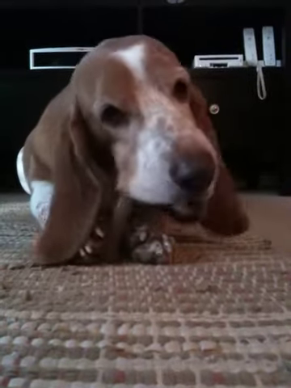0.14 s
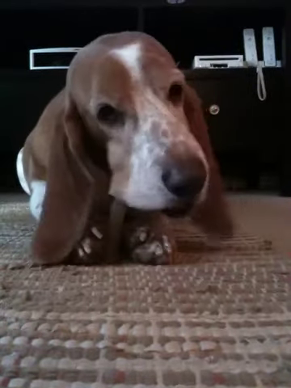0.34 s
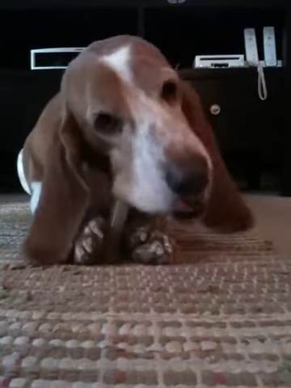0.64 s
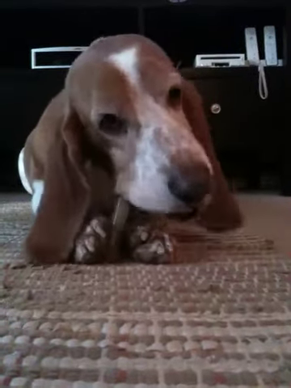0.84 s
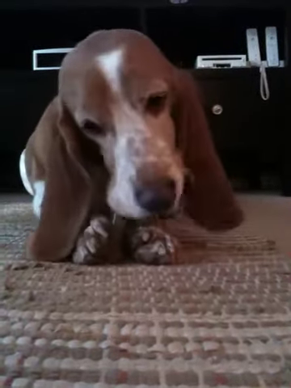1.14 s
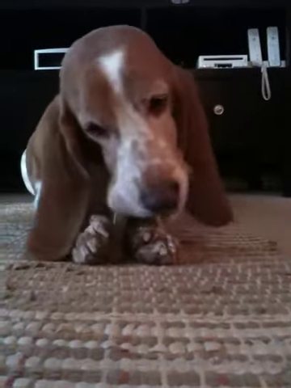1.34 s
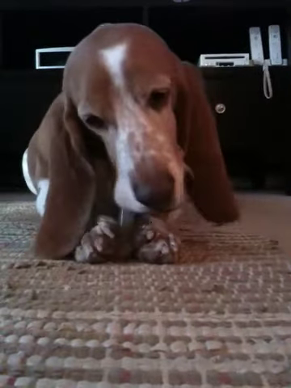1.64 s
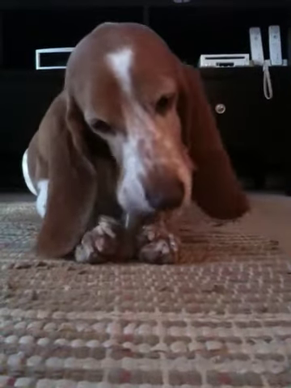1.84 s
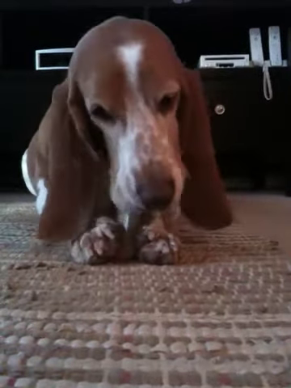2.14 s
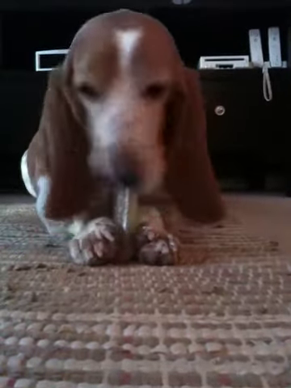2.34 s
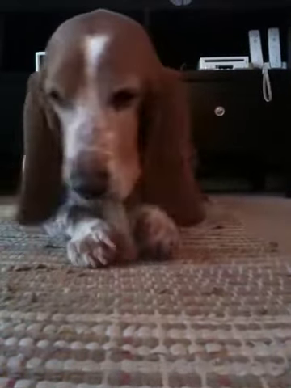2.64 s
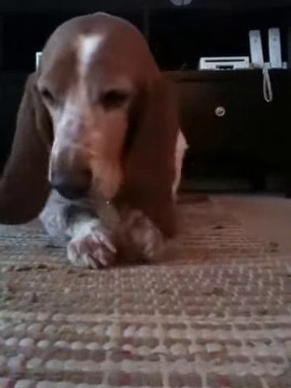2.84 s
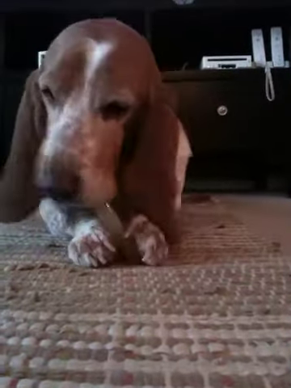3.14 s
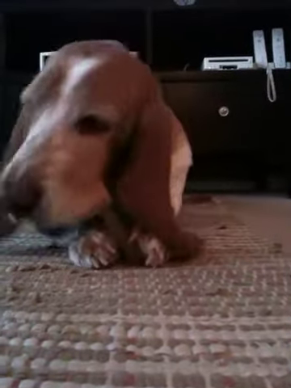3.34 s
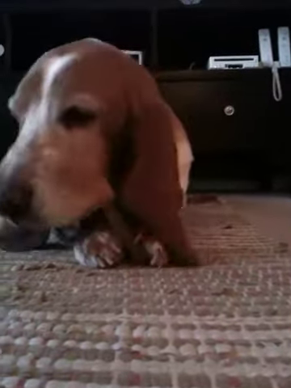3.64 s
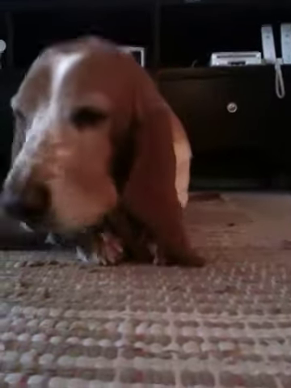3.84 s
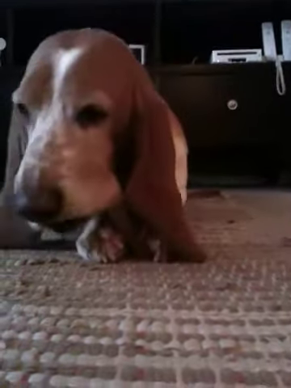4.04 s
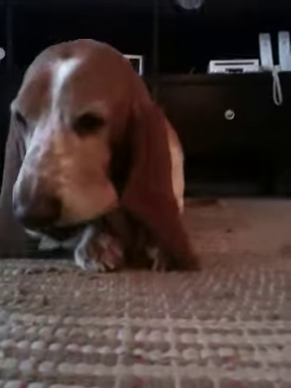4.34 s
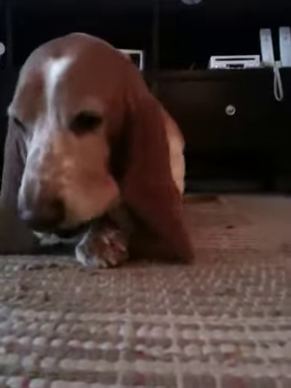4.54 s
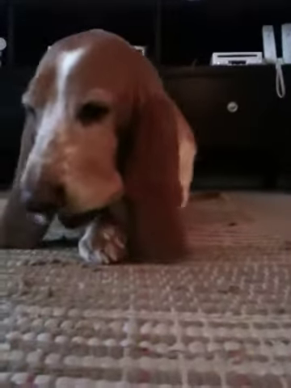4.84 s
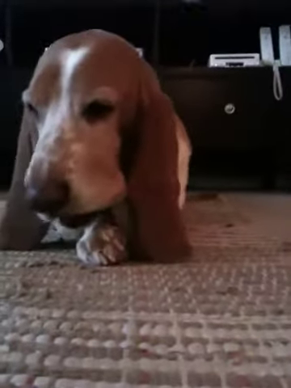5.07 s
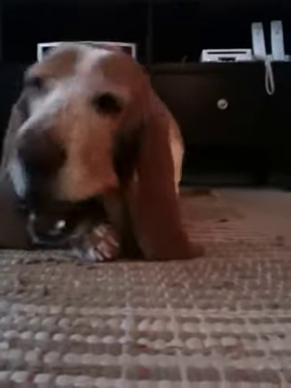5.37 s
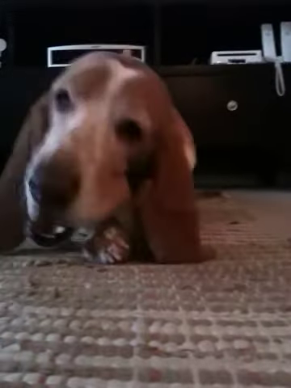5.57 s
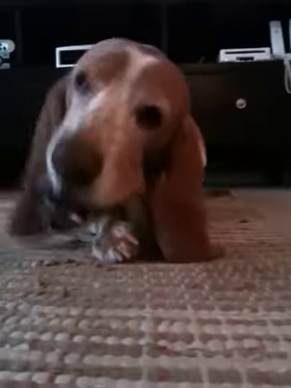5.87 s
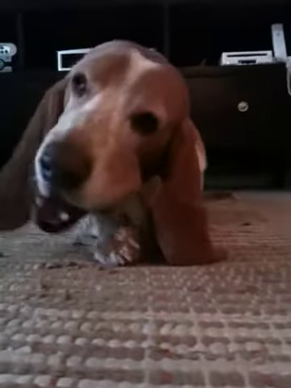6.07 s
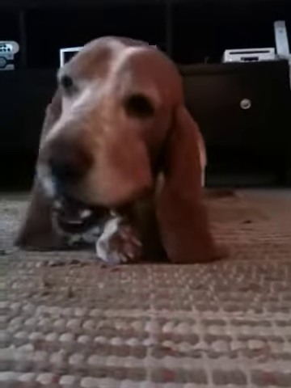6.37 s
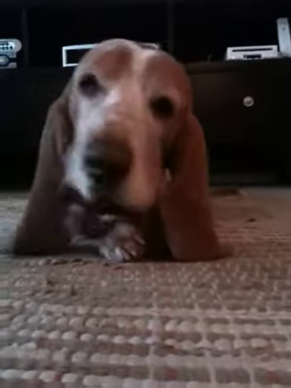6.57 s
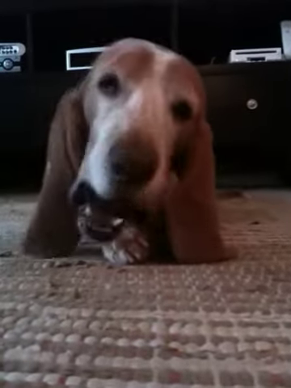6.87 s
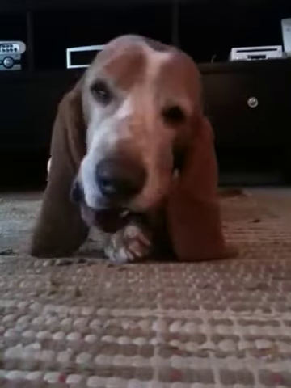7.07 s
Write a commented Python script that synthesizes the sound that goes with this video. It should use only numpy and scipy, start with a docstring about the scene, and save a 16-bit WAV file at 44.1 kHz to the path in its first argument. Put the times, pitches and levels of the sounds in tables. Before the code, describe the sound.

Faint low hiss and a very thin, high electronic whine run throughout a quiet carpeted room. Close by, a dog gnaws a bone: a tiny falling lip squeak at 0.2 s, soft floor knocks, rug brushes and small wet clicks. Hollow tooth clacks land at 1.2, strongly at 1.43, and at 1.6 s. A bone strike rings at 2.0, a lower clack at 2.48, then soft rug strokes. Sharp bony raps come at 3.0, 3.2 and 3.3 s, with wet smacks and a small crack near 3.55. From 3.8 to about 6 s a bite grinds and crackles, with a strong clack and knock at 4.01 and saliva fizz swelling towards 4.85. Two hard snaps burst at 5.29 and 5.43, the latter thudding heavily. Sparse clicks and dull bumps follow, a clack at 5.85, lip smacking at 6.8, and clacks with a bright click around 7.0.

```python
"""Faint hiss and a thin electronic whine come first and last throughout; a faint squeak and soft knocks join in.
A hound on a woven rug in a quiet living room gnaws a bone held between its paws. Bone knocks on teeth
and floor, the wet mouth clicks, and a two-second bite crackles and ends in two hard snaps.
Hits ring filters shaped like floor, mouth and bone; crackle, fizz and strokes are random grains;
hiss is filtered noise, and whine and squeak are sine waves."""
import sys
import numpy as np
from scipy import signal
from scipy.fft import rfft, irfft
from scipy.io import wavfile

SR = 44100
rng = np.random.default_rng(int(sys.argv[2]) if len(sys.argv) > 2 else 0)


def to_wav(sig):
    """Store sig (one row per channel, or 1-D mono) as 16-bit WAV at the path in sys.argv[1].

    Samples outside -1..1 are clipped; the rate is SR.
    """
    pcm = np.clip(np.atleast_2d(sig), -1, 1) * 32767
    pcm = np.round(pcm).astype(np.int16)
    wavfile.write(sys.argv[1], SR, pcm.T)  # frames by channels


N = 317961
TIME = np.arange(N) / SR  # seconds

# how strongly saliva fizzes between lips and bone: time_s, level_db
SALIVA_LEVEL = [(0.5, -82.5), (1.26, -73), (1.62, -70.5), (1.85, -82), (2.95, -82.5), (3.15, -71.5),
                (3.5, -70), (4.33, -65), (4.85, -60.5), (5.1, -63.5), (6.2, -76.5), (6.58, -66.5),
                (6.9, -75.5), (7.2, -71.5)]


def undb(db):
    """Turn decibels into gain."""
    return 10 ** (np.asarray(db) / 20)


def unit(x):
    """Scale a sound to an rms (average strength) of 1."""
    return x / np.sqrt(np.mean(x ** 2))


def add(out, start_s, sound):
    """Mix a sound in at its start time, cutting whatever runs past the end."""
    i = int(round(start_s * SR))
    out[i:i + len(sound)] += sound[:len(out) - i]


def gain_curve(rows):
    """Gain over time from time_s, level_db rows; silent outside them."""
    time_s, level_db = np.transpose(rows)
    return undb(np.interp(TIME, time_s, level_db, left=-np.inf, right=-np.inf))


def flurries(rows, rise_s, fall_s):
    """Gain over time for bursts (peak_s, level_db) that swell quickly and die away."""
    total = np.zeros(N)
    for peak_s, level_db in rows:
        distance = np.maximum((peak_s - TIME) / rise_s, (TIME - peak_s) / fall_s)
        total += undb(level_db) * np.exp(-distance)
    return total


def walk(rate_hz):
    """Smooth random wandering with a spread near 1: random points joined by lines."""
    knots_s = np.arange(0, N / SR + 1, 1 / rate_hz)
    return np.interp(TIME, knots_s, rng.standard_normal(len(knots_s)))


def grains(rate_hz, spread_db, clump_db=0, clump_rate_hz=150, limit=4.583):
    """Random tiny impulses of uneven strength that swell and fade in clumps; rms 1."""
    unevenness = np.minimum(rng.exponential(size=N), limit)
    sizes = undb(spread_db * unevenness + clump_db * walk(clump_rate_hz))
    happens = rng.random(N) < rate_hz / SR
    return unit(happens * sizes * rng.choice([-1, 1], N))


def colour(x, points, size=2048):
    """Filter a sound to a response given as pitch_hz, level_db rows, without sounding ahead of time."""
    pitch_hz, level_db = np.transpose(points)
    f = np.fft.rfftfreq(size, 1 / SR) + 1  # the 1 Hz avoids log(0)
    cepstrum = irfft(np.log(undb(np.interp(np.log(f), np.log(pitch_hz), level_db))))
    # folding the cepstrum forward moves the filter's energy to its start
    cepstrum[1:size // 2] *= 2
    cepstrum[size // 2 + 1:] = 0
    impulse = irfft(np.exp(rfft(cepstrum)))
    return signal.fftconvolve(x, impulse)[:len(x)]


def resonance(f, hz, width_hz):
    """Response of one ringing mode, gain 1 at its centre; a wider mode dies sooner."""
    return 1j * f * width_hz / (hz ** 2 - f ** 2 + 1j * f * width_hz)


def lowpass(f, hz):
    """Response of a two-pole low-pass, which dulls a sound."""
    return 1 / (1 + 1j * np.sqrt(2) * f / hz - (f / hz) ** 2)


def highpass(f, hz):
    """Response of a two-pole high-pass, which thins a sound."""
    return -(f / hz) ** 2 * lowpass(f, hz)


def bending(f, lag_s, low_hz=150):
    """A bending wave carries treble faster than bass; low_hz arrives lag_s late."""
    return np.exp(-2j * np.pi * 2 * lag_s * np.sqrt(low_hz * f))


def struck(part):
    """Event rows for one part of the square hits, scaled by the strength of each hit."""
    # a tooth hits the bone squarely, rings it and knocks it on the floor: start_s, level_db
    strikes = [(2.0012, -7.5), (3.0072, 1.5), (3.2166, -0.5), (3.3052, -3.5)]
    return [(start_s, level_db + part[0], *part[1:]) for start_s, level_db in strikes]


def background(hiss_db=-74, stir_db=-69.5):
    """Steady filtered hiss, a thin electronic whine of sines and the low stirring of the dog's body."""
    # colour of the hiss: pitch_hz, level_db
    hiss_colour = [(18, -58.5), (30, -25.5), (48, -29.5), (121, -1.5), (179, -2), (437, -5.5), (554, -17),
                   (801, -10.5), (1540, -12.5), (7270, -15.5), (13700, -16.5), (14800, -20.5),
                   (16000, -23.5)]
    # tones of the whine: pitch_hz, level_db (rms)
    whine_tones = [(14970, -88), (15030, -87)]
    stir_colour = [(40, -37.0), (130, 2.5), (300, -3.5),
                   (700, -12.5), (2000, -23.5), (8000, -33.0)]  # pitch_hz, level_db
    hiss = undb(hiss_db) * unit(colour(rng.standard_normal(N), hiss_colour))
    whine = sum(undb(db) * np.sqrt(2) * np.sin(2 * np.pi * hz * TIME) for hz, db in whine_tones)
    stir = unit(colour(rng.standard_normal(N), stir_colour))
    return hiss + whine + undb(stir_db + 2 * walk(5.2)) * stir


def brushes(width=1.0, dull=0.87, rise=0.59):
    """Soft strokes catch on the ribs of the weave, swell quickly and die away."""
    # paws, ears and bone brush the rug: start_s, length_s, level_db, centre_hz
    strokes = [(0.733, 0.03, -58.5, 610), (1.774, 0.14, -68, 920), (2.214, 0.073, -62.5, 367),
               (2.673, 0.13, -58.5, 740), (2.815, 0.088, -56.5, 523), (2.916, 0.082, -60, 463),
               (4.523, 0.13, -49, 500), (6.186, 0.09, -66.5, 250)]
    out, f = np.zeros(N), np.fft.rfftfreq(N, 1 / SR)
    for start_s, length_s, level_db, hz in strokes:
        n = int(length_s * SR)
        catches = grains(rate_hz=3000, spread_db=-0.5, clump_db=1.5)
        # width and dull are multiples of the centre pitch
        rug = resonance(f, hz, width * hz) * lowpass(f, dull * hz) * highpass(f, hz / 4)
        rub = irfft(rfft(catches) * rug)[:n]
        swell = np.sin(np.pi * np.linspace(0, 1, n) ** rise)
        add(out, start_s, undb(level_db) * unit(rub) * swell)
    return out


def saliva(fizz_db=1):
    """Small films of saliva burst as the lips work, in a flurry at each smack."""
    # colour of the fizz: pitch_hz, level_db
    fizz_colour = [(300, -24), (1000, 0.5), (3000, -6.5), (5500, -7), (7800, -2.5), (10500, -5),
                   (13000, -15), (16000, -53)]
    # the lips part with a short flurry of fizz: peak_s, level_db
    smacks = [(3.1, -62), (3.38, -68), (3.56, -60.5), (6.04, -69.5), (6.78, -58)]
    bursts = grains(rate_hz=1300, spread_db=4.5, clump_db=3.5)
    fizz = unit(colour(bursts, fizz_colour))
    strength = np.hypot(gain_curve(SALIVA_LEVEL), flurries(smacks, rise_s=0.027, fall_s=0.042))
    return undb(fizz_db) * fizz * strength


def squeak(octave_db=-8):
    """The bone slips against a wet lip with a faint, ragged, falling squeak of two sines."""
    # path of the lip squeak: time_s, pitch_hz, level_db
    path = [(0.166, 803, -75), (0.18, 690, -60), (0.2, 618, -62.5), (0.225, 610, -82)]
    time_s, pitch_hz, level_db = np.transpose(path)
    waver = 1 + .07 * walk(450)  # roughens the pitch
    phase = 2 * np.pi * np.cumsum(np.interp(TIME, time_s, pitch_hz) * waver) / SR
    tone = np.sin(phase) + undb(octave_db) * np.sin(2 * phase)
    ragged = undb(6.2 * walk(195.0))
    return gain_curve(np.c_[time_s, level_db]) * ragged * tone


def stray_ticks(count=40, over_saliva_db=34.5, scatter_db=5, centre_hz=3300, octaves=1.2, width_hz=2500):
    """Event rows for faint ticks at random moments and pitches, stronger while the lips work."""
    times_s = rng.uniform(0, N / SR - .05, count)
    levels_db = over_saliva_db + np.interp(times_s, *np.transpose(SALIVA_LEVEL))
    chances = rng.uniform(-1, 1, (count, 2))
    return [(start_s, level_db + scatter_db * loud, centre_hz * 2 ** (octaves * high), width_hz)
            for start_s, level_db, (loud, high) in zip(times_s, levels_db, chances)]


def clicks(size=1024, dull=1.32, slip_s=0.00054, slip_db=-9):
    """Each click rings one damped resonance of the mouth or bone; the tooth slips and touches again."""
    # the clearest clicks of tooth tips, tongue and lips: start_s, level_db, centre_hz, width_hz
    mouth_clicks = [(0.226, -34, 2680, 1000), (0.7363, -27.5, 2210, 2500), (0.7606, -31.5, 5500, 3700),
                    (0.9385, -24, 2320, 3000), (1.176, -32, 3630, 9900), (1.222, -22, 2500, 2200),
                    (1.279, -26.5, 7100, 14000), (1.3519, -27.5, 9300, 2500), (1.4183, -23.5, 8800, 1300),
                    (1.5671, -27, 9380, 1200), (1.7347, -27, 5380, 800), (1.809, -30.5, 3000, 1200),
                    (2.235, -25.5, 1510, 1200), (2.407, -22.5, 1380, 600), (2.424, -24.5, 1270, 700),
                    (2.478, -25.5, 3250, 900), (3.0622, -22.5, 9400, 1500), (3.104, -32, 3500, 5000),
                    (3.328, -26, 1300, 700), (3.5602, -19.5, 5950, 8000), (3.6373, -16.5, 8130, 1200),
                    (3.7276, -22, 2430, 4000), (3.769, -20.5, 1810, 3000), (3.933, -25, 3140, 3000),
                    (4.014, -18.5, 3430, 1800), (4.17, -23.5, 6600, 9900), (4.484, -16.5, 6600, 2670),
                    (4.5325, -12.5, 5300, 1600), (5.6817, -24.5, 5860, 5200), (5.727, -17, 7810, 701),
                    (6.0391, -29, 7600, 1197), (6.476, -27, 2100, 3200), (6.594, -23, 7500, 5000),
                    (6.7687, -26, 8030, 4440), (6.7828, -22, 8250, 3010), (6.8005, -20, 8700, 1300),
                    (7.006, -24, 2920, 1000), (7.0652, -2, 7800, 1080)]
    # modes of the struck bone: level_db, centre_hz, width_hz
    bone_modes = [(-4, 1350, 200), (-6.5, 1660, 220), (-10, 2200, 140), (-16, 3200, 180),
                  (-14.5, 4270, 800), (-14.5, 5580, 300), (-22, 7350, 1100)]
    out, f = np.zeros(N), np.fft.rfftfreq(size, 1 / SR)
    bone_rings = [row for mode in bone_modes for row in struck(mode)]
    rows = mouth_clicks + bone_rings + stray_ticks()
    for (start_s, level_db, hz, width_hz), chance in zip(rows, rng.random(len(rows))):
        delay_s = slip_s * (.5 + chance)
        touches = 1 + undb(slip_db) * np.exp(-2j * np.pi * f * delay_s)
        ring = resonance(f, hz, width_hz) * lowpass(f, dull * hz)
        add(out, start_s, undb(level_db) * irfft(touches * ring))
    return out


def knocks(size=4096, floor_hz=150, floor_width_hz=52, thump_db=16.5, lag_s=0.0071,
           cut_hz=122, sub_hz=76, softness=2.3, rebound_s=.026, rebound_db=-1.5):
    """Each knock chirps down through the floorboards into their low thump; a loose bone rebounds."""
    # the bone bumps the floor: start_s, level_db, contact_brightness_hz, rebound_count
    bumps = [(0.274, -14, 231, 0), (0.365, -19, 149, 0), (0.654, -16.5, 157, 1), (0.778, -14, 405, 0),
             (0.829, -15.5, 262, 1), (1.042, -15.5, 302, 3), (1.227, -6.5, 380, 0), (1.352, -13, 200, 0),
             (1.433, -1.5, 445, 0), (1.902, -13.5, 149, 0), (2.031, -16.5, 300, 1), (2.929, -16, 200, 0),
             (3.090, -14.5, 553, 0), (3.171, -16, 300, 0), (3.42, -19.5, 150, 0), (3.875, -11.5, 190, 0),
             (3.949, -11, 150, 0), (4.014, -0.5, 380, 0), (5.643, -8, 149, 0), (6.061, -20, 159.4, 0),
             (6.351, -14, 139, 0), (6.654, -15.5, 138, 0), (6.963, -6.5, 139, 0), (7.004, -4.5, 247, 0)]
    # floor knock of a square hit: level_db, contact_brightness_hz, rebound_count
    strike_knock = (-12.5, 1060, 0)
    out, f = np.zeros(N), np.fft.rfftfreq(size, 1 / SR)
    radiation = highpass(f, cut_hz) * highpass(f, sub_hz)
    floorboards = 1 + undb(thump_db) * resonance(f, floor_hz, floor_width_hz)
    for start_s, level_db, bright_hz, rebounds in bumps + struck(strike_knock):
        contact = lowpass(f, bright_hz) * lowpass(f, softness * bright_hz)
        knock = irfft(contact * floorboards * bending(f, lag_s) * radiation)
        for k in range(1 + round(rebounds)):  # each rebound is later and weaker
            add(out, start_s + k * rebound_s, undb(level_db + k * rebound_db) * knock)
    return out


def clacks(size=4096, lag_s=0.00469, dull=1.26, echo_s=.0093, echo_db=-6, echo_hz=900,
           cut_hz=145, skid_s=0.0055):
    """Teeth close on the bone and skid; the mouth's hollow rings; furniture sends back a dull echo."""
    # hollow clacks of teeth on bone: start_s, level_db, mouth_ring_hz, width_hz, upper_modes_db
    bites = [(1.2, -10, 1070, 450, -11), (1.4363, 7.5, 648, 450, 0.5), (1.6102, 1, 740, 500, -14),
             (2.479, 1, 434, 220, -7), (4.0115, 7.5, 694, 151, -4), (5.8487, -4, 786, 700, -15),
             (7.003, -9, 814, 160, -9), (7.0636, -3.5, 770, 200, 2)]
    # modes of the mouth's hollow: multiple_of_ring, level_db
    mouth_modes = [(0.418, 2.5), (1, 1), (2.6, -10.5), (4.1, -20)]
    out, f = np.zeros(N), np.fft.rfftfreq(size, 1 / SR)
    echo = 1 + undb(echo_db) * lowpass(f, echo_hz) * np.exp(-2j * np.pi * f * echo_s)
    for start_s, level_db, ring_hz, width_hz, upper_db in bites:
        skid = rng.standard_normal(size) * np.exp(-TIME[:size] / skid_s)
        contact = 1 + .5 * rfft(skid / np.linalg.norm(skid))
        hollow = 0
        for k, mode_db in mouth_modes:
            gain = undb(mode_db + upper_db * (k > 2))  # only the upper modes get upper_db
            mode = resonance(f, k * ring_hz, min(k, 1) * width_hz)
            hollow = hollow + gain * mode * lowpass(f, dull * k * ring_hz) ** 2
        clack = contact * hollow * highpass(f, cut_hz) * bending(f, lag_s) * echo
        add(out, start_s, undb(level_db) * irfft(clack))
    return out


def crunch(crackle_db=3, grind_db=2, surge_db=0.53, register_hz=(900, 3300, 9000), overlap=1.0):
    """Fibres of every size break under pressure in three registers, over tooth grinding on bone."""
    # one long bite, its pressure under the back teeth: time_s, level_db
    bite = [(3.78, -81), (3.87, -62), (4.17, -63), (4.33, -59), (4.85, -58.5), (5.15, -59.5), (5.5, -61),
            (5.75, -66), (5.92, -68.5), (6.05, -92)]
    # colour of crackle and grinding: pitch_hz, level_db
    bite_colour = [(40, -27), (80, -15), (140, 4), (350, 2.5), (600, -3.5), (1050, -5), (2000, -8.5),
                   (3400, -16), (5500, -14), (7800, -13), (10500, -17), (13000, -18.5), (16000, -30)]
    # the bone yields and the crackle surges: peak_s, level_db
    yields = [(3.56, -58.5), (3.92, -67.5), (5.28, -54.5), (5.41, -55.5), (5.88, -68)]
    f = np.fft.rfftfreq(N, 1 / SR)
    breaks = 0
    for hz in register_hz:
        snapping = grains(rate_hz=1100, spread_db=4, clump_db=5.0)
        breaks = breaks + rfft(snapping) * resonance(f, hz, overlap * hz)
    fibres = unit(colour(irfft(breaks, N), bite_colour))
    cheek_colour = [(300, -2), (1200, -3.5), (10000, -5.5)]  # pitch_hz, level_db
    through_cheek = colour(rng.standard_normal(N), cheek_colour)
    grinding = unit(colour(through_cheek, bite_colour))
    pressure = np.hypot(gain_curve(bite), flurries(yields, rise_s=.016, fall_s=.115))
    surges = undb(surge_db * walk(25))
    return pressure * surges * (undb(crackle_db) * fibres + undb(grind_db) * grinding)


def cracks(thud_lag_s=0.00041, recoil_s=.00032, recoil_db=-4):
    """A fracture snaps one way and recoils the other; the jaws then jolt shut with a thud."""
    # the bone gives way: start_s, snap_db, jaw_thud_db
    fractures = [(3.5406, -12.5, -5), (5.0465, -18, -33), (5.1302, -15.5, -30), (5.2517, -15.5, -26),
                 (5.2935, 9, 7.5), (5.4072, -17.5, -18.5), (5.4095, -15, -1.5), (5.4264, 6.5, 30),
                 (5.435, -10.5, -2.5)]
    # colour of a fracture's snap: pitch_hz, level_db
    snap_colour = [(60, -17), (300, -1), (650, -9.5), (1200, -1), (2500, -2.5), (3500, -8), (4500, -4.5),
                   (6300, -4), (8000, -10.5), (11000, -16), (16000, -33.5)]
    # colour of the thud that it sends through the jaw: pitch_hz, level_db
    thud_colour = [(40, -46.5), (80, -22.5), (130, -6.5), (220, 1), (400, -3), (750, -10.5), (1050, -8),
                   (1800, -14.5), (4000, -40.5), (16000, -63)]
    snaps, thuds = np.zeros(N), np.zeros(N)
    for start_s, snap_db, thud_db in fractures:
        add(snaps, start_s, [-undb(snap_db)])
        add(snaps, start_s + recoil_s, [undb(snap_db + recoil_db)])
        add(thuds, start_s + thud_lag_s, [undb(thud_db)])
    return colour(snaps, snap_colour) + colour(thuds, thud_colour)


def room(x, t60_s, wet_db, first_s=0.0098):
    """A short, soft tail from a carpeted room: noise that fades by 60 dB in t60_s."""
    # colour of the tail: pitch_hz, level_db
    room_colour = [(50, -21), (150, -2), (400, 8.5), (1000, 1.5), (3000, -12), (8000, -5), (16000, -16.5)]
    t = TIME[:SR // 2]
    noise = colour(rng.standard_normal(len(t)), room_colour)
    tail = noise * undb(-60 * t / t60_s) * (t > first_s)
    evened = np.sqrt(t60_s * SR / np.log(1e6))  # keeps long tails from being louder
    return undb(wet_db) * signal.fftconvolve(x, tail)[:N] / evened


def scene():
    """The snaps fly straight out of the mouth at the microphone; knocks and clacks stir the room more."""
    mouth = brushes() + saliva() + squeak() + clicks() + crunch() + cracks()  # rug strokes share its tail
    floor, teeth = knocks(), clacks()
    tails = room(mouth, t60_s=0.49, wet_db=-33)
    tails += room(floor, t60_s=0.13, wet_db=-11.5)
    tails += room(teeth, t60_s=0.13, wet_db=-13.5)
    return (background() + mouth + floor + teeth + tails)[None]


def record(dry, top_hz=16100):
    """The recorder cuts the top with a steep low-pass."""
    return signal.sosfilt(signal.ellip(8, .2, 70, top_hz, fs=SR, output="sos"), dry)


dry = scene()
out = record(dry)
to_wav(out)
```